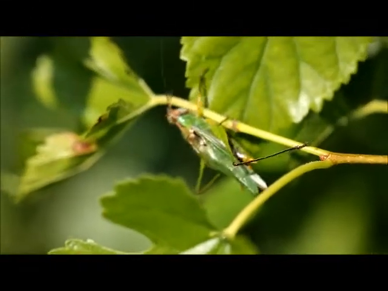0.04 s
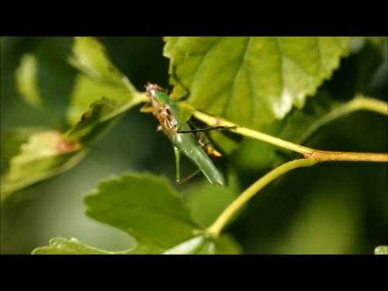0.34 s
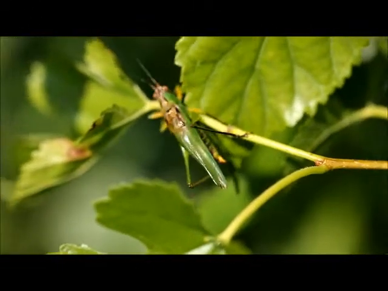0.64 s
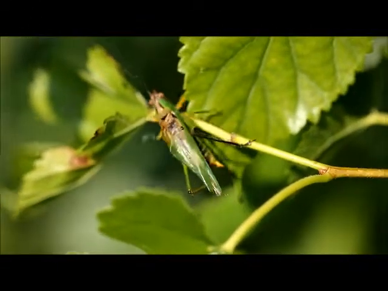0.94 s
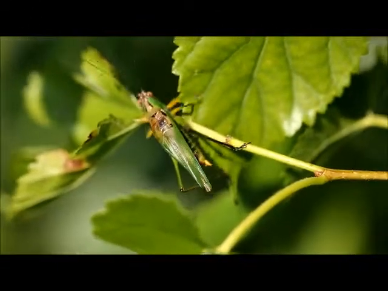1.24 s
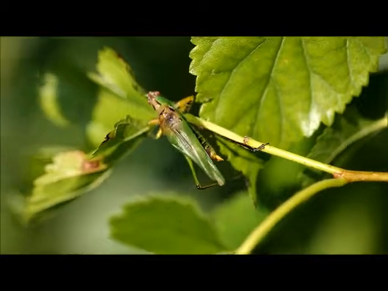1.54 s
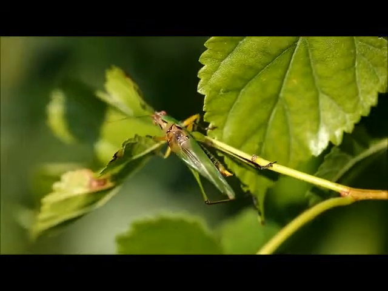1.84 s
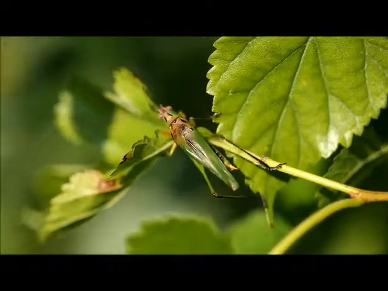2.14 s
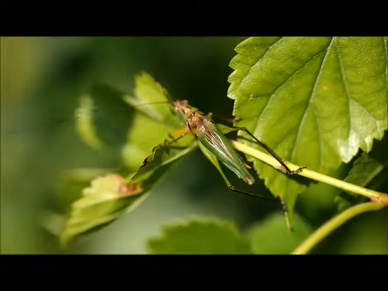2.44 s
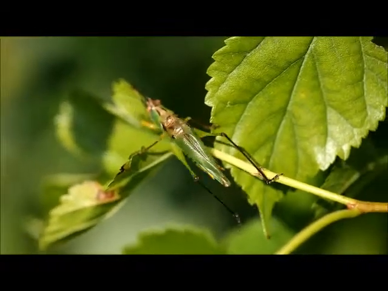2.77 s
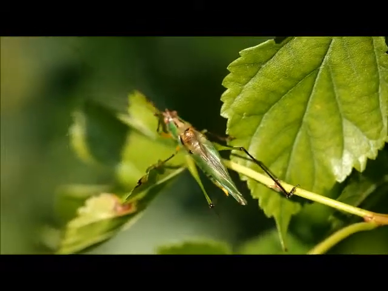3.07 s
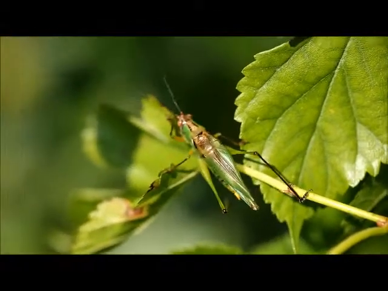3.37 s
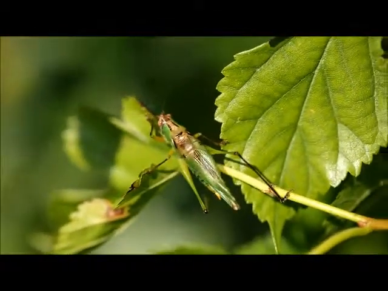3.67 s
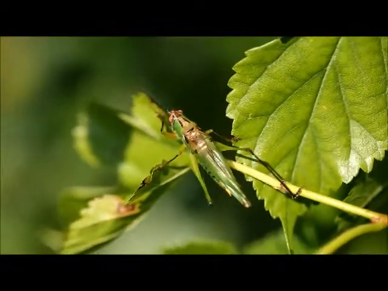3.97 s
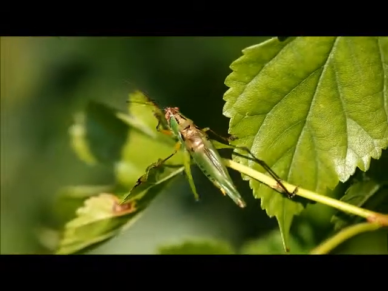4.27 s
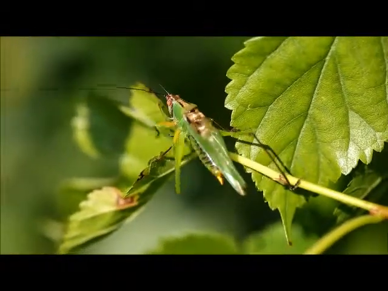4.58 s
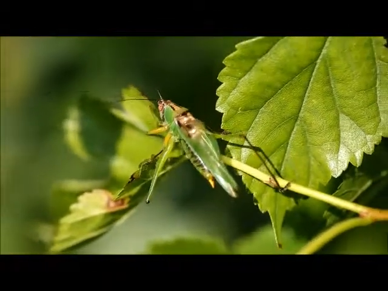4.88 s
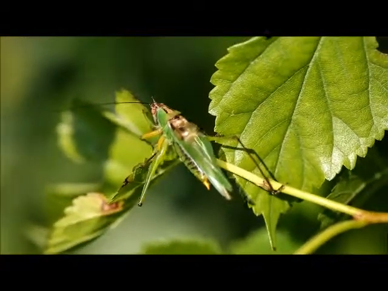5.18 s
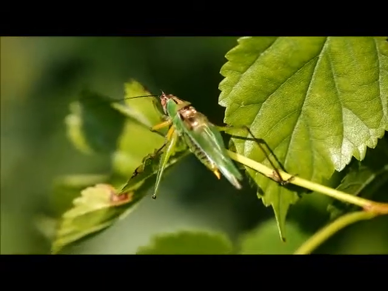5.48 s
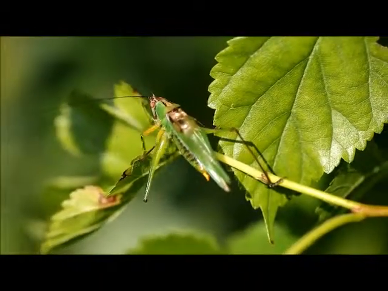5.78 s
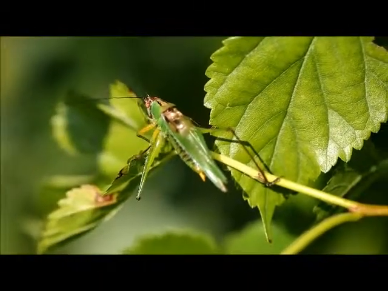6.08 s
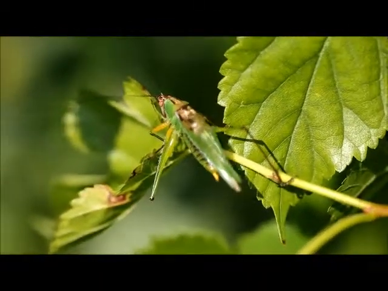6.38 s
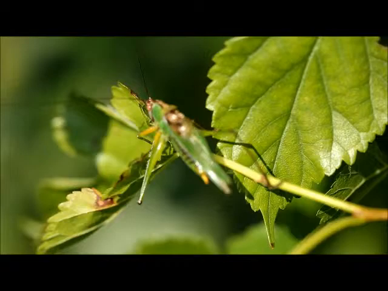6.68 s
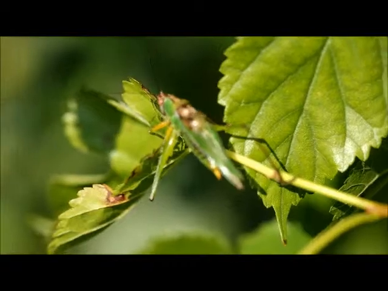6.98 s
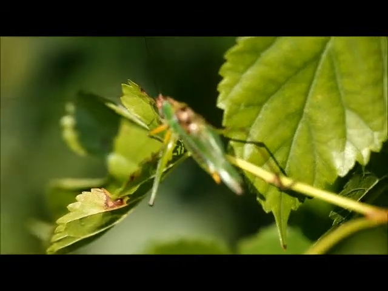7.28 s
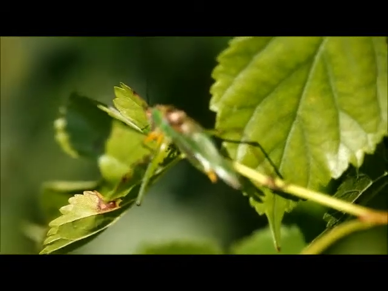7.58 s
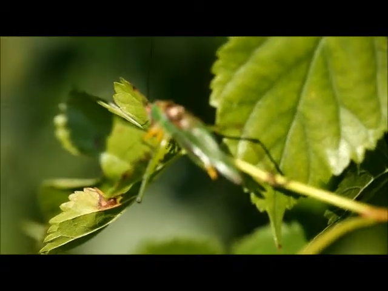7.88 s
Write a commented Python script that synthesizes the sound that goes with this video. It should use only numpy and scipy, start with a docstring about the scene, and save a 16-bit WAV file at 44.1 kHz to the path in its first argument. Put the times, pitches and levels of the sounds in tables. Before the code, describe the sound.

Close to the microphone, a katydid among leaves gives a few sharp ticks, then a very high, buzzing trill lasting about a second. It repeats this four times at an even pace. Fainter insects answer from the vegetation, over far traffic, a low hum and a few faint, distant yelps. The background dips under each trill and swells back in the pauses.

```python
"""A katydid on a twig

Close by, a katydid stridulates, drawing a scraper on one wing over a file on the other: a few sharp
ticks, then a buzzing trill, four times over. Other insects answer from the vegetation; behind them
are far traffic, a low hum, thin bands of drone and hiss, and a few distant yelps. An automatic gain
control ducks under the song and lets the background swell back in every pause."""
import sys
import numpy as np
from scipy import signal
from scipy.fft import rfft, irfft, next_fast_len
from scipy.io import wavfile
from scipy.ndimage import uniform_filter1d, minimum_filter1d, map_coordinates

SR = 44100
rng = np.random.default_rng(int(sys.argv[2]) if len(sys.argv) > 2 else 0)


def inscribe(sig):
    """Save sig as 16-bit PCM at rate SR to the path in sys.argv[1].

    A 1-D sig is mono; a 2-D sig holds one channel per row.
    Samples are clipped to [-1, 1] before scaling.
    """
    pcm = np.round(np.clip(np.atleast_2d(sig).T, -1, 1) * 32767)
    wavfile.write(sys.argv[1], SR, pcm.astype(np.int16))


N = 349272
TIME_S = np.arange(N) / SR


def amp(db):
    """The decibel scale: 20 dB is a factor of ten in amplitude."""
    return 10 ** (np.asarray(db) / 20)


def unit(x):
    """Normalisation to an rms of 1."""
    return x / np.sqrt(np.mean(x ** 2) + 1e-20)


def along(points, hz):
    """Interpolation of (frequency_hz, level_db) points on a logarithmic frequency axis."""
    frequency_hz, level_db = np.transpose(points)
    return np.interp(np.log(hz + 1), np.log(frequency_hz + 1), level_db)


def wobble(rate):
    """Smooth random modulation: a spline through rate random knots a second."""
    return map_coordinates(rng.standard_normal(int(N * rate / SR) + 4), [TIME_S * rate])


def filtered(x, response):
    """Zero-phase filtering: the spectrum is multiplied by a gain at each frequency."""
    size = next_fast_len(N + SR // 2)
    return irfft(rfft(x, size) * response(np.fft.rfftfreq(size, 1 / SR)), size)[:N]


def noise(spectrum):
    """Spectral shaping turns white noise into coloured noise of rms 1."""
    return unit(filtered(rng.standard_normal(N), lambda hz: amp(along(spectrum, hz))))


def band(centre_hz, width_hz, size=next_fast_len(N)):
    """Narrow-band noise of rms 1: white noise weighted by a Lorentzian peak."""
    detuning = 2 * (np.fft.rfftfreq(size, 1 / SR) - centre_hz) / width_hz
    return unit(irfft(rfft(rng.standard_normal(size)) / (1 + detuning ** 2), size))[:N]


def impacts(times, sizes):
    """Ideal impacts: each is an impulse one sample long."""
    return np.bincount(np.clip(np.round(times * SR).astype(int), 0, N - 1), sizes, N)


def ring(x, spectrum, modes=(), size=2048):
    """Resonance: x excites a minimum-phase body of unit energy with this spectrum and these modes."""
    hz = np.fft.rfftfreq(size, 1 / SR)
    peaks_db = sum(db / (1 + (2 * (hz - centre) / width) ** 2) for centre, width, db in modes)
    cepstrum = irfft(np.log(amp(along(spectrum, hz) + peaks_db)))
    cepstrum[1:size // 2] *= 2  # folding onto positive time makes the response causal
    cepstrum[size // 2 + 1:] = 0
    body = irfft(np.exp(rfft(cepstrum)))
    return signal.oaconvolve(x, body / np.linalg.norm(body))[:N]


def foliage(x, t60):
    """Multiple scattering from leaves: a diffuse tail of unit energy, falling 60 dB in t60 seconds."""
    t = np.arange(SR // 3) / SR
    tail = rng.standard_normal(len(t)) * amp(-60 * t / t60) * (1 - np.exp(-t / 0.0032))
    return signal.oaconvolve(x, tail / np.linalg.norm(tail))[:N]


def vehicle(nearest_s, level_db, pitch_hz, half_power_s=0.64):
    """Spherical spreading: a passing vehicle's tyre noise varies as one over its distance."""
    # tyre noise spectrum for a pitch of 1000 Hz: frequency_hz, relative_db
    tyre_spectrum = [(100, -27.5), (450, -3), (820, -5.5), (1000, -1), (1130, -3), (1500, -12), (2000, -24),
                     (5000, -62)]
    spectrum = [(hz * pitch_hz / 1000, db) for hz, db in tyre_spectrum]
    relative_distance = np.hypot(1, (TIME_S - nearest_s) / half_power_s)
    return amp(level_db) / relative_distance * noise(spectrum)


def traffic(rumble_db=-36.5):
    """Superposition of incoherent sources: a far road's rumble and the tyres of passing vehicles."""
    # vehicles on the road: nearest_s, level_db, pitch_hz
    vehicles = [(.75, -40, 900), (2.8, -40.5, 965), (4.6, -45.5, 1040), (6.4, -34.5, 1373),
                (7.75, -39.5, 1510)]
    # spectrum of the rumble: frequency_hz, relative_db
    road_spectrum = [(20, -13), (38, -2.5), (58, 3), (85, 1), (130, 1), (200, 0.5), (310, -1.5), (400, -7),
                     (700, -2.5), (1500, -6), (2700, -22.5), (5000, -26), (9000, -21), (16000, -30)]
    tyres = sum(vehicle(*row) for row in vehicles)
    rumble = amp(rumble_db + 1.26 * wobble(9.6)) * noise(road_spectrum)
    return rumble + amp(0.54 * wobble(13)) * tyres


def hum(steady_db=-49, extra_db=10.5, settle_s=0.44):
    """Narrow-band noise heard as a low hum; its level relaxes exponentially to a steady value."""
    level_db = steady_db + extra_db * np.exp(-TIME_S / settle_s)
    return amp(level_db) * band(centre_hz=61.3, width_hz=31)


def whines():
    """Bandwidth sets the timbre: the narrowest noise bands drone, the wider ones hiss."""
    # steady noise bands: centre_hz, width_hz, level_db
    bands = [(280, 4.2, -55), (319.4, 6.3, -55), (3764, 70, -57), (4095, 530, -52), (8220, 260, -53.5)]
    return sum(amp(db) * band(centre, width) for centre, width, db in bands)


def far_insects(chorus_db=-46.5, stroke_hz=62):
    """Distant trills add in power to a fluttering hiss; a neighbour's ticks arrive as scatter."""
    # spectrum of the insects in the vegetation: frequency_hz, relative_db
    meadow = [(4000, -47), (7000, -23), (9000, -14), (11200, -1.5), (12600, -0.5), (14300, -1.5),
              (15200, -6), (16000, -17)]
    snaps, trill_envelope = neighbour()
    stroke_cycles = np.cumsum(stroke_hz + 3 * wobble(2.1)) / SR
    flutter_db = 0.63 * np.sin(2 * np.pi * stroke_cycles) + 0.82 * wobble(35) + 0.69 * wobble(400)
    hiss = np.hypot(amp(chorus_db), trill_envelope) * amp(flutter_db) * noise(meadow)
    return hiss + foliage(ring(snaps, meadow), t60=0.24)


def patter(start_s=.171, length_s=0.037, level_db=-13, count=6):
    """A jittered impulse train, heard as a few faint dry clicks in quick succession."""
    jitter, size = rng.standard_normal((2, count))
    times = start_s + length_s * np.linspace(0, 1, count) + 0.00082 * jitter
    return impacts(times, amp(level_db + 2 * size))


def scrape(starts, lengths, force, contour, teeth, hurry, jitter_s):
    """Stridulation: each file tooth gives a click and a pip; contour lists position, level_db."""
    # the wing's pitch falls as the scraper runs down the file: position (0 to 1), pitch_hz
    wing_glide = [(0, 13900), (.55, 11700), (.8, 11000), (1, 9360)]
    position = np.linspace(0, 1, teeth)
    jitter, bite, phase = rng.standard_normal((3, len(starts), teeth))
    elapsed = position + hurry * position * (1 - position)  # the scraper speeds up along the file
    times = starts[:, None] + np.outer(lengths, elapsed) + jitter_s * jitter
    sizes = force[:, None] * amp(np.interp(position, *np.transpose(contour)) + 1.17 * bite)
    pitch_hz = np.interp(position, *np.transpose(wing_glide))
    t = np.arange(SR // 1000) / SR
    age = t / .0001  # a pip peaks after 0.1 ms
    pips = 0.39 * age * np.exp(1 - age) * np.sin(2 * np.pi * (pitch_hz[:, None] * t + phase[..., None]))
    click = t == 0
    strikes = sizes[..., None] * (pips + click)
    index = np.round(times * SR).astype(int)[..., None] + np.arange(len(t))
    return np.bincount(index.ravel(), strikes.ravel(), N)[:N]


def ticks(rows):
    """Impulsive excitation: a snap of the wings hits the file hard at once and eases off."""
    start_s, level_db, length_s = np.transpose(rows)
    contour = [(0, 7.8), (.15, 7.1), (.7, 5.9), (1, 3)]
    return scrape(start_s, length_s, amp(level_db), contour, teeth=22, hurry=0.12, jitter_s=.00005)


def chatter(strikes, decay_s):
    """Contact rattle: each strike of the scraper leaves noise whose power decays exponentially."""
    pole = np.exp(-1 / (decay_s * SR))
    power = signal.lfilter([1 - pole], [1, -pole], strikes ** 2)
    return np.sqrt(np.abs(power)) * rng.standard_normal(N)


def katydid(shift_s=2.5):
    """Source and filter: tooth impacts ring the wing, whose radiation depends on its direction."""
    # single wing snaps: start_s, level_db, length_s
    snaps = [(0.427, 3, 0.0041), (.488, 5.5, 0.0085), (.8703, 4.5, 0.0094), (0.968, 6, .01),
             (1.0295, 7, 0.009), (2.8645, 3, 0.012), (2.917, 5, 0.0076), (2.957, -11, 0.0044),
             (2.9867, .5, .009), (4.7282, 3, .01), (4.781, 3.5, 0.0088), (4.8318, 0.5, 0.012),
             (6.418, 5.5, .01), (6.4673, 2.5, 0.009), (6.522, -0.5, .009)]
    # runs of wing strokes: first_stroke_s, last_stroke_s, level_db
    trill_runs = [(1.0535, 1.9406, 9), (3.0062, 3.936, 7), (4.856, 5.8302, 7), (6.554, 7.4508, 6.5)]
    # the wing's radiation side-on: frequency_hz, relative_db
    wing_side = [(2400, -44), (4800, -34.5), (6000, -28), (6700, -22), (8300, -21.5), (9200, -12.5),
                 (10000, -3.5), (10600, -10), (11400, -6), (12450, -9.5), (13200, -2.5), (14700, -11),
                 (15800, -1.5), (19000, -3)]
    # its radiation once the insect has shifted on its twig: frequency_hz, relative_db
    wing_back = [(2400, -45.5), (4000, -34), (5900, -26.5), (6450, -21), (7500, -18), (8600, -21.5),
                 (10000, -5.5), (10700, -8), (12050, -2.5), (12900, -9), (14300, -5), (15000, -9.5),
                 (15700, -2), (19000, -5.5)]
    # narrow wing resonances: centre_hz, width_hz, boost_db
    wing_modes = [(7680, 160, 4), (8000, 140, 4), (8850, 150, 3), (10350, 200, 4), (10950, 160, 4),
                  (11650, 250, 2), (12250, 260, 4), (12620, 120, 3), (13050, 130, 5), (13600, 280, 5),
                  (14080, 200, 3), (15550, 300, 2)]
    # the duller rasp of wings not yet fully engaged: frequency_hz, relative_db
    rasp = [(1200, -25), (3000, -18.5), (5200, -9), (6500, 3), (8200, 6), (9500, 7.5), (12000, -26)]
    trills = [trill(*row) for row in trill_runs]
    strikes = ticks(snaps) + sum(trills) + patter()
    strikes = strikes + amp(-7) * chatter(strikes, decay_s=0.0031)
    shifted = TIME_S > shift_s
    side_on = ring(strikes * ~shifted, wing_side, wing_modes)
    turned = ring(strikes * shifted, wing_back, wing_modes)
    # the first strokes of a trill rasp lower, and the wings part with a tiny click before each snap
    early = sum(strokes * np.exp(-np.abs(TIME_S - first_s) / 0.092)
                for strokes, (first_s, _, _) in zip(trills, trill_runs))
    snap_s, snap_db, _ = np.transpose(snaps)
    parting = impacts(snap_s - .023, amp(snap_db - 21))
    rasping = ring(chatter(amp(-8.5) * early + parting, decay_s=0.0015), rasp)
    song = amp(-1) * (side_on + turned) + rasping
    near_leaves = amp(-17) * foliage(song, t60=0.0079)
    far_leaves = amp(-23) * foliage(song, t60=0.11)
    return song + near_leaves + far_leaves


def neighbour(count=5, gap_s=.052, tick_s=.012, tick_boost_db=7, swell_s=0.057, fade_s=.05):
    """A farther katydid stridulates: gives its ticks and the exponential rise and fall of its trills."""
    # songs, each a run of ticks and then a trill: first_tick_s, trill_end_s, level_db
    songs = [(0.507, 1.8, -35.5), (2.109, 3.39, -38), (3.74, 5.104, -38), (5.5, 6.813, -37),
             (7.144, 8.3, -38.5)]
    snaps, envelope = [], np.zeros(N)
    for first_s, end_s, db in songs:
        snaps += [(first_s + k * gap_s, db + tick_boost_db, tick_s) for k in range(count)]
        age_s = np.maximum(TIME_S - first_s - count * gap_s, 0)
        fade = np.exp(-np.maximum(TIME_S - end_s, 0) / fade_s)
        envelope += amp(db) * (1 - np.exp(-age_s / swell_s)) * fade
    return ticks(snaps), envelope


def trill(first_s, last_s, level_db, period_s=.01605):
    """Periodic excitation: the wings close about 62 times a second, and the strokes fuse into a buzz."""
    count = round((last_s - first_s) / period_s) + 1
    progress = np.linspace(0, 1, count)
    lead_s = .008 * progress * (1 - progress ** 2)  # the strokes slow slightly as they go
    starts = first_s + (last_s - first_s) * progress - lead_s + .00015 * rng.standard_normal(count)
    build_up_db = -15.8 * np.exp(-(starts - first_s) / 0.08)
    force = amp(level_db + build_up_db + np.clip(rng.standard_normal(count), -1, 1) / 2)
    lengths = .009 * (1 + .03 * rng.standard_normal(count))
    # each closing stroke swells tooth by tooth; the opening stroke only brushes the file
    swell = [(0, -0.5), (.3, 3.5), (.6, 4), (.85, 1), (1, 4)]
    brush = [(0, -37), (1, -11)]
    closing = scrape(starts, lengths, force, swell, teeth=14, hurry=.4, jitter_s=.00005)
    opening = scrape(starts + 0.012, lengths / 2, force, brush, teeth=7, hurry=0.074, jitter_s=.0002)
    return closing + opening


def far_calls():
    """Gaussian bursts of narrow-band noise, heard as hoarse far yelps blurred by reverberation."""
    # short distant calls: peak_s, pitch_hz, level_db
    yelps = [(2.35, 1230, -31), (2.438, 1040, -32), (2.571, 900, -31), (3.921, 930, -31)]
    t = np.arange(-SR // 20, SR // 20) / SR
    envelope = np.exp(-(t / 0.009) ** 2)
    calls = np.zeros(N)
    for peak_s, pitch_hz, db in yelps:
        start = round((peak_s + t[0]) * SR)
        calls[start:start + len(t)] += amp(db) * envelope * band(pitch_hz, width_hz=240, size=len(t))
    return calls + amp(-16) * foliage(calls, t60=.3)


def scene():
    """Superposition: the singer and all that lies behind it add in one channel."""
    return (katydid() + far_insects() + far_calls() + traffic() + hum() + whines())[None]


def ducking(x, ceiling_db, attack_s, recovery_db_per_s, start_db):
    """Peak hold: gain reduction in dB follows the mean power above a ceiling, then lets go steadily."""
    pole = np.exp(-1 / (attack_s * SR))
    level_db = 10 * np.log10(signal.lfilter([1 - pole], [1, -pole], x * x) + 1e-12)
    excess_db = np.maximum(level_db - ceiling_db, 0)
    release_db = recovery_db_per_s * TIME_S
    held_db = np.maximum.accumulate(excess_db + release_db)
    return np.maximum(held_db, start_db) - release_db


def record(dry, top_hz=15800):
    """Compression: a slow gain control and a limiter act on the full band, ahead of a low-pass filter."""
    x = dry[0]
    slow = ducking(x, ceiling_db=-20.5, attack_s=0.1, recovery_db_per_s=17.9, start_db=15.0)
    fast = ducking(x, ceiling_db=-10.5, attack_s=0.00086, recovery_db_per_s=33, start_db=0)
    look_ahead_db = minimum_filter1d(-np.maximum(slow, fast), size=64)
    gain_db = uniform_filter1d(look_ahead_db, size=32)
    return filtered(x * amp(gain_db), lambda hz: np.clip((top_hz - hz) / 200 + .5, 0, 1))[None]


dry = scene()
out = record(dry)
inscribe(out)
```